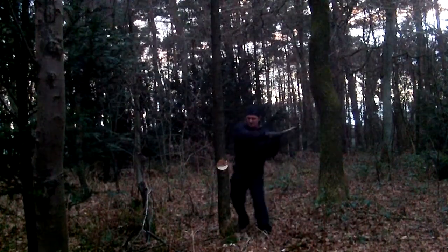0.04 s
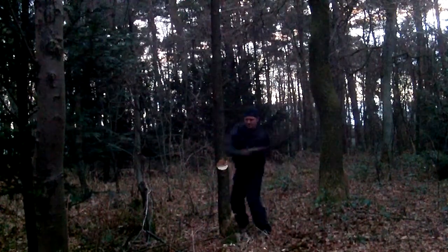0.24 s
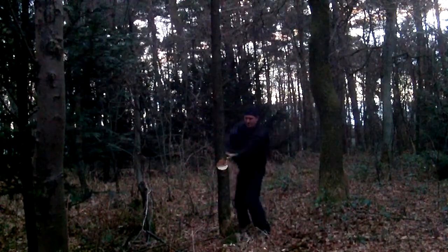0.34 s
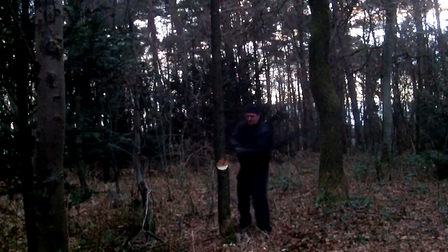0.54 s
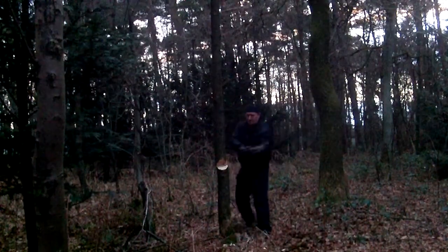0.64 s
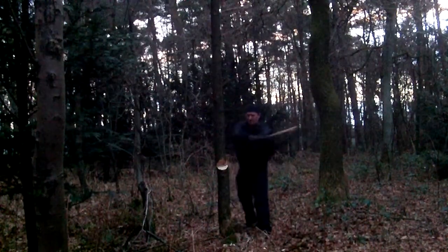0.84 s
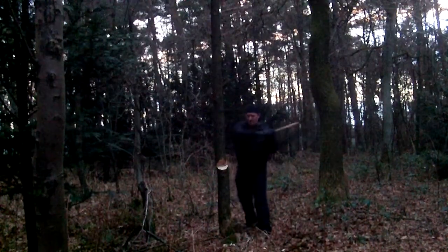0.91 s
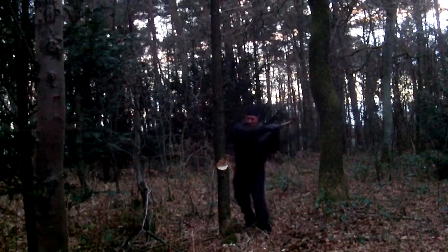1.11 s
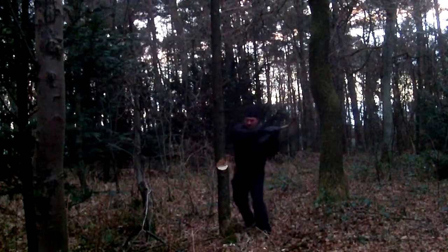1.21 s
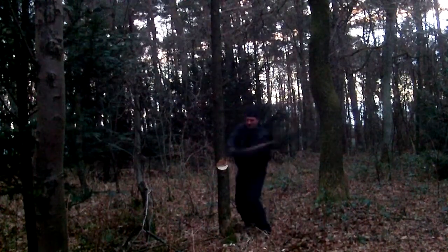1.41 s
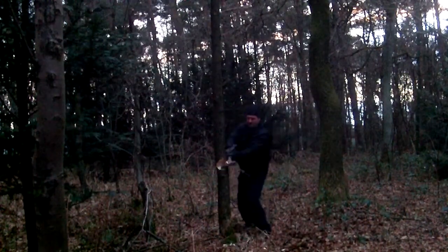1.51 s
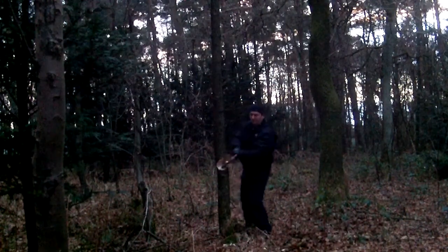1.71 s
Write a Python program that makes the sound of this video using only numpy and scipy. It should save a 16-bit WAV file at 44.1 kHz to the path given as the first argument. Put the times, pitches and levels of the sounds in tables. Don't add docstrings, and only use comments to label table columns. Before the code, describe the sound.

An axe chops a dead trunk in a quiet forest. At about 0.24 s a loud, bright crack lands with a hollow woody knock, short thud and a quick secondary knock at 0.28 s. The trees return a diffuse tail. Chips tick and patter into dry leaves, with small taps near 0.92, 1.09 and 1.31 s. A duller, softer-edged second blow hits at 1.42 s. Faint distant traffic hum, light wind rumble and thin electronic whine lie beneath.

```python
import sys
import numpy as np
from scipy import signal
from scipy.io import wavfile

SR = 44100
rng = np.random.default_rng(int(sys.argv[2]) if len(sys.argv) > 2 else 0)


def convert_level_to_amplitude(level_db):
    exponent = np.asarray(level_db, float) / 20
    return 10 ** exponent


def to_wav(sig):
    pcm = np.clip(np.atleast_2d(sig), -1, 1) * 32767
    pcm = np.round(pcm).astype(np.int16)
    wavfile.write(sys.argv[1], SR, pcm.T)


N = 77175


def rms_one(x):
    return x / np.sqrt(np.mean(x ** 2) + 1e-20)


def in_time(rows):
    return np.interp(np.arange(N) / SR, *np.transpose(rows))


def at_hz(points, hz):
    freq_hz, value = np.transpose(points)
    return np.interp(np.log(hz), np.log(freq_hz), value)


def fade(t60, size):
    return convert_level_to_amplitude(-60 * np.arange(size) / SR / max(t60, .003))


def add(out, s, x):
    i = int(s * SR)
    out[i:i + len(x)] += x[:N - i]


def bandpass(x, low_hz, high_hz):
    return signal.sosfilt(signal.butter(2, [low_hz, high_hz], "band", fs=SR, output="sos"), x)


def drift(rate):
    stride = 40
    pole = np.exp(-2 * stride * np.pi * rate / SR)
    noise = rng.standard_normal(N // stride + 2002)
    slow = signal.lfilter([1], [1, -2 * pole, pole * pole], noise)[2000:]
    return np.interp(np.arange(N) / stride, np.arange(len(slow)), rms_one(slow))


def bands(x, low_hz, high_hz):
    edges = low_hz * 2 ** np.arange(0, np.log2(high_hz / low_hz) + 1 / 3, 1 / 3)
    for k, (low, high) in enumerate(zip(edges, edges[1:])):
        yield np.sqrt(low * high), bandpass(x[k % 2], low, high)


def coloured(x, spectrum, patchy_db, rate):
    together = drift(rate)
    out = np.zeros(N)
    for hz, band in bands(x, spectrum[0][0], min(spectrum[-1][0], 16000)):
        flicker_db = patchy_db * (together + drift(rate))
        out += convert_level_to_amplitude(at_hz(spectrum, hz) + flicker_db) * band[-N:]
    return rms_one(out)


def far_hum():
    # freq_hz, density_db [dB per Hz]
    hum_spectrum = [(110, 2.5), (250, -4.5), (600, -8), (1300, -10), (1900, -20), (4000, -39), (8000, -39),
                    (15500, -46)]
    noise = rng.standard_normal((2, N + SR))
    return convert_level_to_amplitude(-49.5) * coloured(noise, hum_spectrum, patchy_db=.4, rate=6)


def wind():
    # time_s, level_db
    gust_level = [
        (0, -48.5),
        (.15, -41.5),
        (.33, -36.5),
        (.6, -44),
        (.75, -45.5),
        (1.0, -41.5),
        (1.35, -46.5),
        (1.6, -39),
        (1.75, -40.5),
    ]
    # freq_hz, density_db [dB per Hz]
    gust_spectrum = [(22, -14.5), (45, 0), (70, -11), (110, -18), (200, -91)]
    noise = rng.standard_normal((2, N + SR))
    return convert_level_to_amplitude(in_time(gust_level)) * coloured(noise, gust_spectrum, patchy_db=1.2, rate=16)


def rustle():
    # time_s, level_db
    stir_level = [(0, -63.5), (.23, -69), (.33, -46), (.5, -53.5), (.6, -55.5), (.75, -61.5), (.88, -67),
                  (1.0, -61.5), (1.15, -56.5), (1.3, -66.5), (1.41, -63.5), (1.52, -55.5), (1.65, -58),
                  (1.75, -56)]
    # freq_hz, density_db [dB per Hz]
    leaf_spectrum = [(700, -56), (1500, 6.5), (3000, -0.5), (5000, -7.5), (7500, -19), (11000, -33),
                     (15500, -38.5)]
    clicks_per_s, grain_db, hiss = 2000, 3.5, 0.16
    sizes = convert_level_to_amplitude(grain_db * np.minimum(rng.exponential(1, (2, N)), 5))
    sizes = sizes * rng.choice([-1, 1], (2, N))
    clicks = rms_one(sizes * (rng.random((2, N)) < clicks_per_s / SR))
    grains = clicks + hiss * rng.standard_normal((2, N))
    return convert_level_to_amplitude(in_time(stir_level)) * coloured(grains, leaf_spectrum, patchy_db=.6, rate=8)


def chips_in_leaves():
    # start_s, level_db, centre_hz, t60_s
    landings = [(0.195, -65, 11100, 0.13), (0.285, -40, 8000, 0.0292), (.3505, -48, 6500, 0.012),
                (.384, -44.5, 5700, 0.0104), (.433, -71.5, 3079, 0.052), (0.544, -64.5, 7414, 0.81),
                (.598, -56.5, 4950, 0.115), (.700, -65, 11060, 0.135), (.924, -54, 3500, 0.092),
                (0.924, -63, 9850, 0.0965), (.996, -63.5, 10400, 0.16), (1.064, -66.5, 4040, 0.048),
                (1.0839, -47.5, 5000, 0.015), (1.0831, -49, 12100, 0.0102), (1.089, -55.5, 8300, 0.221),
                (1.088, -47, 2210, 0.085), (1.139, -53.5, 3830, 0.0134), (1.146, -45.5, 2790, 0.0316),
                (1.1467, -49.5, 9500, 0.0152), (1.201, -56.5, 5400, 0.051), (1.22, -56.5, 6700, 0.093),
                (1.271, -57, 3500, 0.0275), (1.311, -52.5, 3690, 0.049), (1.362, -59.5, 5400, 0.123),
                (1.43, -41.5, 8900, 0.063), (1.512, -59.5, 10800, 0.027), (1.619, -58, 8900, 0.0142),
                (1.676, -49, 5350, 0.0277), (1.703, -63, 8550, 0.214), (1.736, -61.5, 9000, 0.074)]
    out = np.zeros(N)
    for s, db, hz, t60 in landings:
        grit = rng.standard_normal(9000) * convert_level_to_amplitude(3 * rng.standard_normal(9000))
        burst = rms_one(bandpass(grit, hz / 1.8, min(hz * 1.45, 16000)))
        add(out, s, convert_level_to_amplitude(db) * burst * fade(t60, size=9000))
    return out


def trees(blows):
    # freq_hz, t60_s
    decay_time = [(100, 0.5), (300, 0.5477), (1000, 1.1044), (3000, 0.5715), (8000, 0.4449),
                  (15000, 0.2135)]
    # freq_hz, level_db
    scatter_spectrum = [(100, 7), (200, 11), (400, -2.5), (1200, -4), (2200, -13), (3200, -10), (7000, -13),
                        (15000, -24)]
    # start_s, level_db
    scattered_blows = [
        (.238, -39),
        (0.278, -53.5),
        (1.420, -40),
    ]
    delay_s, rise_s = .012, .008
    t = np.arange(SR) / SR

    def tail(spectrum):
        dying = np.zeros(SR)
        for hz, band in bands(rng.standard_normal((2, SR)), 77.27, 15000):
            dying += convert_level_to_amplitude(at_hz(spectrum, hz)) * band * fade(at_hz(decay_time, hz), size=SR)
        return dying * np.clip((t - delay_s) / rise_s, 0, 1)

    nearly_flat = [(100, 0), (15000, 0.0067)]
    out = convert_level_to_amplitude(-52) * signal.fftconvolve(blows, tail(nearly_flat))[:N]
    for s, db in scattered_blows:
        scatter = tail(scatter_spectrum)
        add(out, s - delay_s, convert_level_to_amplitude(db) * scatter / np.std(scatter[:SR // 10]))
    return out


def swell(hz, t60, rise, blur=1):
    t = np.arange(SR // 2) / SR
    turn = 2 * np.pi * hz * t
    neighbours = 0.337 * np.sin(turn * 1.3) + 0.18 * np.sin(turn * 0.8428)
    build = (1 - np.exp(-t * hz / rise)) ** 2
    return (np.sin(turn) + blur * neighbours) * build * fade(t60, size=len(t))


def struck_modes(rows, gain_db, rise, blur=1):
    out = np.zeros(N)
    for s, db, hz, t60 in rows:
        add(out, s, convert_level_to_amplitude(db + gain_db) * swell(hz, t60, rise, blur))
    return out


def chip_taps():
    # start_s, level_db, pitch_hz, t60_s
    tap_modes = [(0.3505, -44, 7100, .012), (0.351, -46, 7600, .01), (.9205, -33, 891, 0.028),
                 (.923, -33, 620, 0.026), (.9265, -35, 1043, 0.025), (.929, -46, 2400, .015),
                 (1.084, -43, 4300, .008), (1.0842, -44, 6600, .006), (1.087, -42, 1524, 0.025),
                 (1.089, -47, 2150, .02), (1.144, -42, 2277, 0.017), (1.147, -46, 1800, .015),
                 (1.163, -48, 2230, 0.016), (1.270, -47, 1132, 0.034), (1.3085, -26, 1098, 0.015),
                 (1.311, -24.5, 620, 0.013)]
    return struck_modes(tap_modes, gain_db=8, rise=2.0)


def trunk_thuds():
    # start_s, push [signed amplitude], pitch_hz, t60_s
    jolts = [(0.237, 0.185, 170.4, 0.1143), (0.2426, 0.088, 215.5, 0.077), (.2500, 0.998, 158.3, 0.0254),
             (0.255, 0.0775, 59.5, 0.194), (.268, 0.0097, 107.8, 0.747), (0.285, 0.0288, 248.1, 0.156),
             (0.31, 0.0175, 140, 0.177), (0.334, 0.011, 167.3, 0.107), (1.4188, 0.261, 115.6, 0.0538),
             (1.4250, -0.577, 172.4, 0.0302), (1.437, 0.397, 157.3, 0.0512), (1.4456, 0.056, 185, 0.153),
             (1.448, 0.0348, 124.1, 0.275), (1.45, 0.0165, 284.8, 0.1337), (1.431, 0.0246, 53.8, 1)]
    out = np.zeros(N)
    for s, push, hz, t60 in jolts:
        add(out, s, 1.291 * push * swell(hz, t60, rise=0.505))
    return out


def wood_knocks():
    # start_s, level_db, pitch_hz, t60_s
    knock_modes = [(.2365, -21, 915, 0.033), (.2418, -10, 1004, 0.0169), (.2425, -8.5, 1195, 0.0193),
                   (.2450, -36, 405, 0.0616), (0.2458, -15, 1109, 0.019), (.2485, -30, 1075, 0.0835),
                   (.2495, -12, 619.3, 0.0341), (0.251, -15.5, 1245, 0.0212), (.2540, -33, 825, 0.03),
                   (0.2551, -24.5, 956.2, 0.0476), (.2600, -30, 1397, .04), (.2803, -8.5, 1165, 0.01346),
                   (0.2802, -32.5, 1376, 0.0474), (.2830, -25, 683, 0.028), (0.2849, -26.5, 1059, 0.037),
                   (0.2884, -23, 921.4, 0.0192), (0.298, -36, 1385, 0.039), (.305, -34, 802.6, 0.04),
                   (0.314, -41.5, 1148, 0.0482), (1.4130, -17.5, 549.7, 0.0212),
                   (1.4215, -6.5, 878, 0.01054), (1.4230, -17.5, 454.4, 0.0303), (1.4255, -24, 657, 0.028),
                   (1.429, -25.5, 1011, 0.033), (1.4335, -20, 1148, 0.0239), (1.434, -29.5, 710, 0.0446),
                   (1.440, -27, 330.4, 0.0606), (1.444, -39.5, 1200, 0.0806), (1.454, -32, 404, 0.0714)]
    return struck_modes(knock_modes, gain_db=8, rise=2.0)


def blade_snaps():
    # start_s, level_db, pitch_hz, t60_s
    snap_modes = [(.2358, 0, 2662, 0.00772), (.2360, -8.5, 2946, 0.0078), (.2361, -7, 1423, 0.0136),
                  (.2362, -14, 3457, 0.0095), (.2363, -6.5, 3845, 0.0057), (.2364, -18.5, 4696, 0.0074),
                  (.2365, -26.5, 10620, 0.006), (.2368, -8.5, 6270, 0.00477), (0.2361, -27.5, 8430, 0.011),
                  (.2380, -29, 4138, 0.038), (.2400, -30, 4576, 0.0123), (.2410, -17.5, 3445, 0.0135),
                  (.2440, -17, 1580, 0.0397), (.2450, -24, 2870, 0.0125), (0.2509, -17, 3475, 0.0084),
                  (.2510, -39, 5500, 0.012), (.2740, -31, 3500, .03), (0.2785, -21, 2191, 0.011),
                  (.2800, -29.5, 2894, 0.0164), (0.2856, -42, 6840, 0.0078), (0.29, -35.5, 2660, 0.0099),
                  (.308, -35.5, 3412, 0.0188), (1.4136, -22, 2948, 0.0154), (1.4136, -25, 2324, 0.0148),
                  (1.4140, -36, 4580, 0.0063), (1.4155, -26.5, 2870, .008), (1.4216, -15, 2646, 0.01255),
                  (1.4219, -21, 3250, 0.011), (1.4220, -21.5, 1965, 0.0152), (1.4221, -31, 5888, .006),
                  (1.4222, -21.5, 4913, 0.0078), (1.426, -23, 3054, 0.0087), (1.4375, -38.5, 3715, 0.011),
                  (1.477, -40, 4355, 0.0097)]
    return struck_modes(snap_modes, gain_db=6, rise=2.2, blur=0)


def resonate(x, hz, t60):
    r, w = convert_level_to_amplitude(-60 / (t60 * SR)), 2 * np.pi * hz / SR
    gain = np.sqrt(1 - r * r)
    return signal.lfilter([gain, 0, -gain], [1, -2 * r * np.cos(w), r * r], x)


def edge_cracks():
    # start_s, level_db, t60_s
    fractures = [(.2360, -7.5, 0.00685), (0.2373, -26.5, 0.081), (0.2495, -32.5, 0.0155),
                 (.2745, -37.5, 0.034), (0.2845, -33, 0.017), (0.291, -40, 0.088), (1.4137, -25.5, 0.0151),
                 (1.4195, -32.5, 0.011), (1.4211, -23, 0.0149), (1.424, -32.5, 0.027),
                 (1.437, -42.5, 0.086)]
    # pitch_hz, level_db, t60_s
    blade_modes = [(2620, 1.5, 0.00154), (3270, -5.5, 0.00216), (3500, -17, 0.036), (4220, -11.5, 0.06),
                   (4789, -6.5, 0.014), (6514, -10.5, 0.0086)]
    burst, dull = np.full(N, 1e-18), np.full(N, 1e-18)
    onset = np.minimum(np.arange(8000) / 50, 1) ** 1.5
    for s, db, t60 in fractures:
        noise = convert_level_to_amplitude(db) * rng.standard_normal((2, 8000)) * onset
        add(burst, s, noise[0] * fade(t60, size=8000))
        add(dull, s, noise[1] * fade(t60 * 2.3, size=8000))
    out = 0.12 * bandpass(burst, 2200, 6000) + 0.049 * burst
    out += bandpass(dull, 357, 1700)
    for hz, db, t60 in blade_modes:
        out += convert_level_to_amplitude(db + 2.5) * resonate(burst, hz, t60) / 2
    return out


def scene():
    crack_softening = signal.butter(1, 6500, fs=SR)
    blows = signal.lfilter(*crack_softening, edge_cracks())
    blows += wood_knocks() + chip_taps() + blade_snaps() + trunk_thuds()
    background = far_hum() + wind() + rustle()
    return (background + chips_in_leaves() + trees(blows) + blows)[None]


def low_pass(x):
    return signal.sosfilt(signal.butter(12, 16660, fs=SR, output="sos"), x)


def record(dry):
    x = dry
    # notch_hz, width_hz, depth
    for hz, width, depth in [(8050, 1300, .85), (1900, 500, .55)]:
        x = x - depth * signal.lfilter(*signal.iirpeak(hz, hz / width, fs=SR), x)
    x = x / (1 + (x / .68) ** 4) ** .25
    whine_hz = 15734
    turn = 2 * np.pi * whine_hz * np.arange(N) / SR
    fuzz = signal.lfilter(*signal.iirpeak(whine_hz - 60, 60, fs=SR), rng.standard_normal(N))
    x = x + convert_level_to_amplitude(-77 + 2 * drift(8)) * np.sin(turn)
    x = x + convert_level_to_amplitude(-84) * np.sin(turn / 2) + convert_level_to_amplitude(-81) * rms_one(fuzz)
    x = signal.sosfilt(signal.cheby2(14, 32, 16000, fs=SR, output="sos"), x)
    return low_pass(x)


dry = scene()
out = record(dry)
to_wav(out)
```